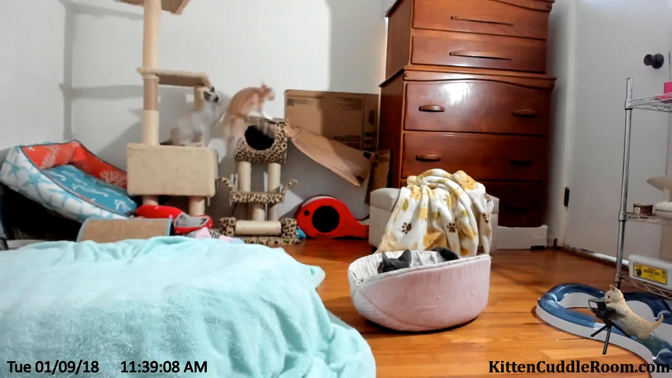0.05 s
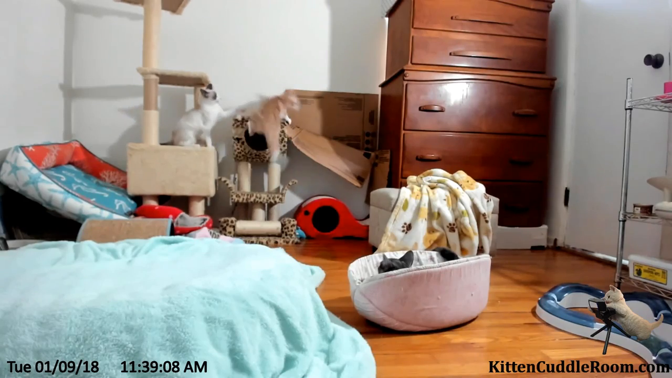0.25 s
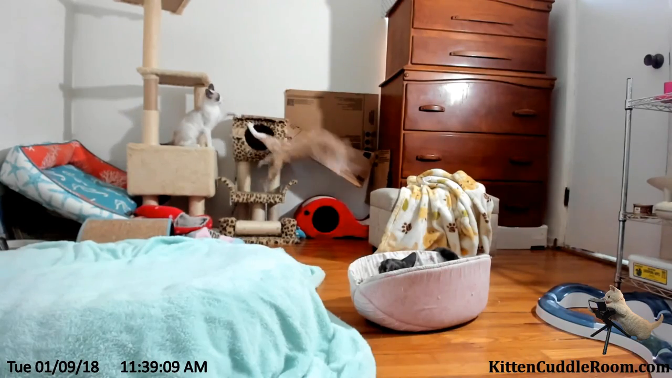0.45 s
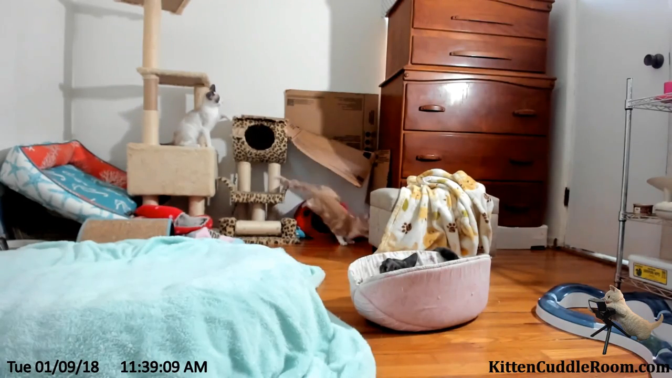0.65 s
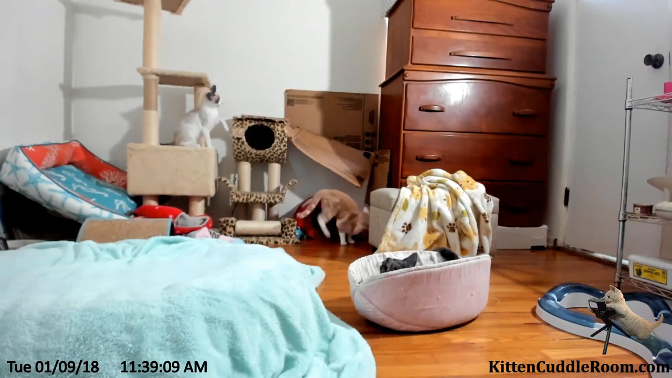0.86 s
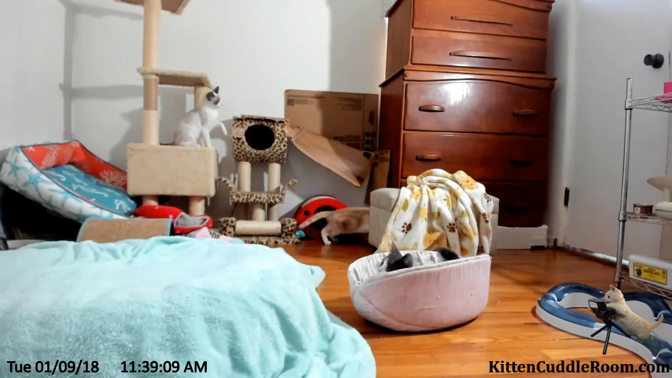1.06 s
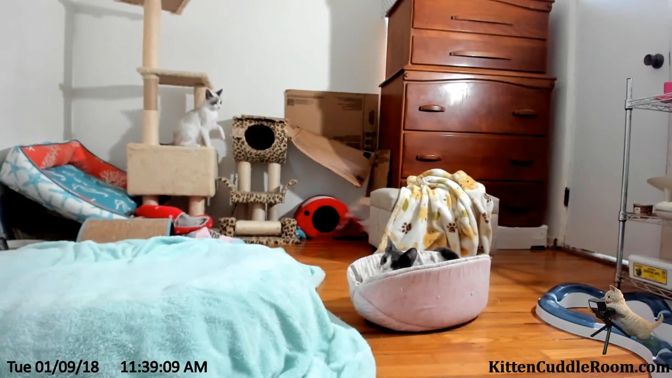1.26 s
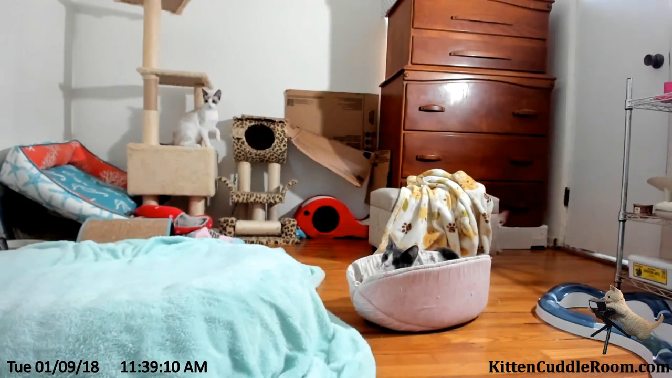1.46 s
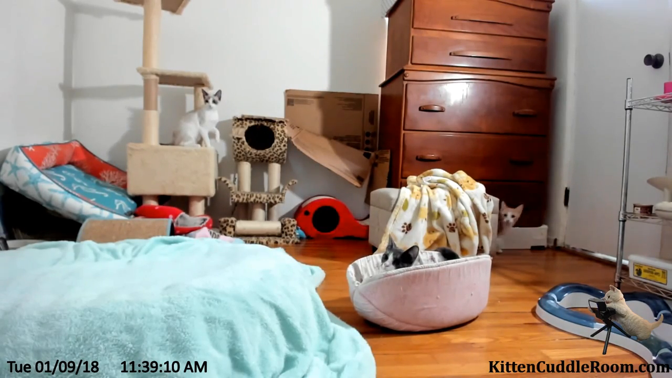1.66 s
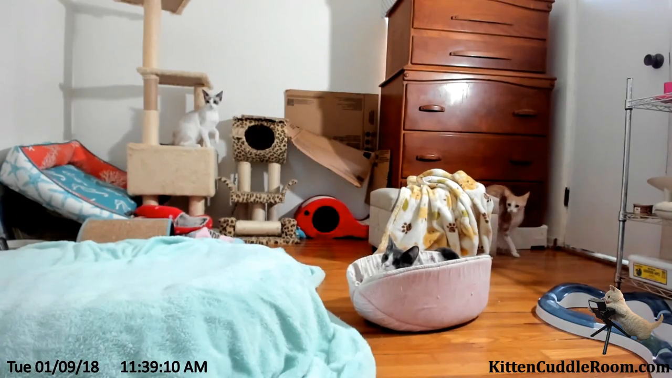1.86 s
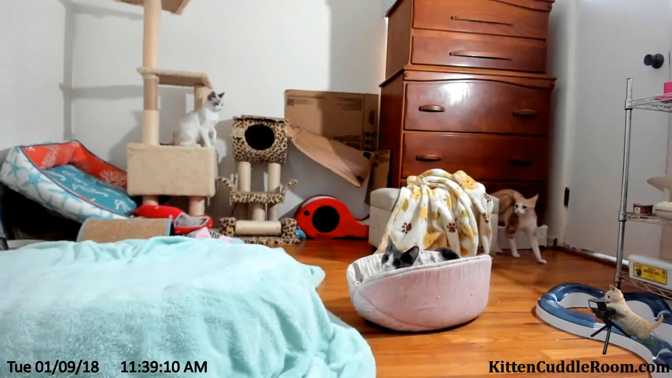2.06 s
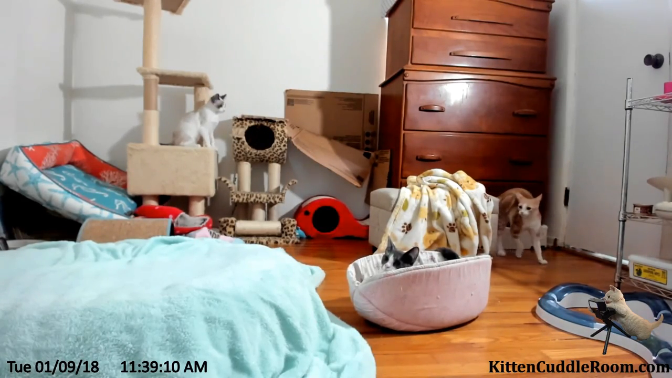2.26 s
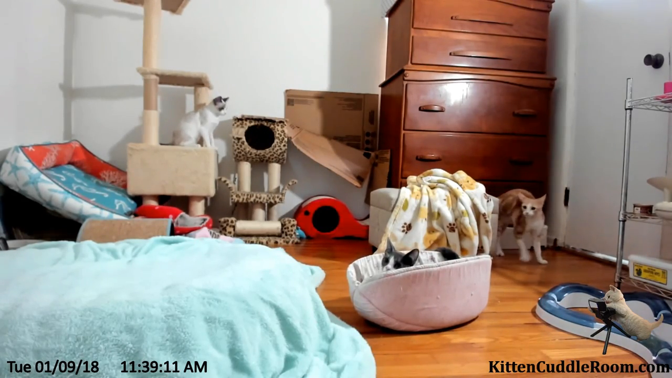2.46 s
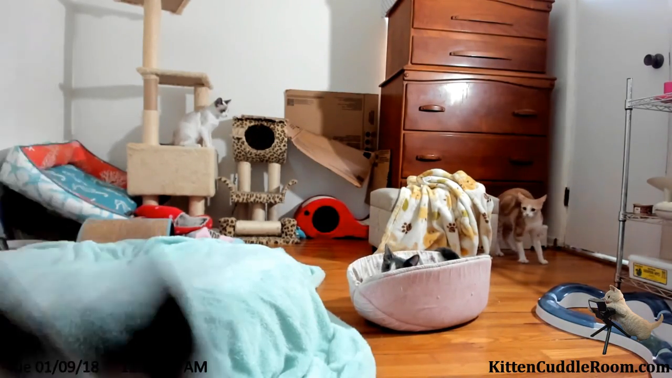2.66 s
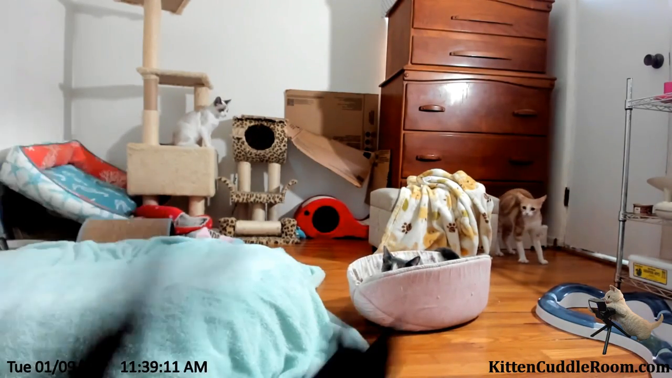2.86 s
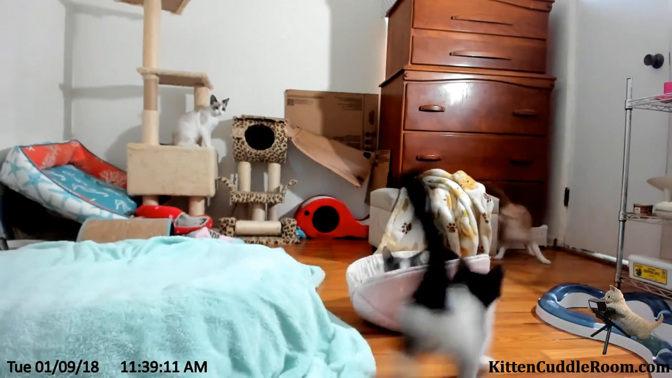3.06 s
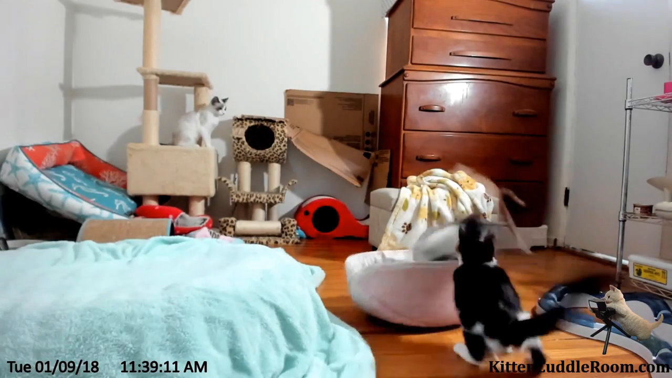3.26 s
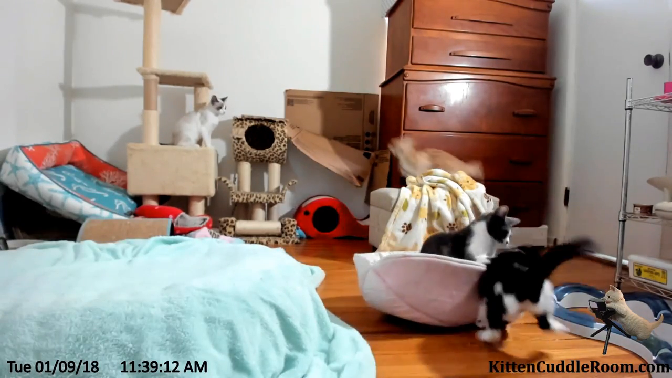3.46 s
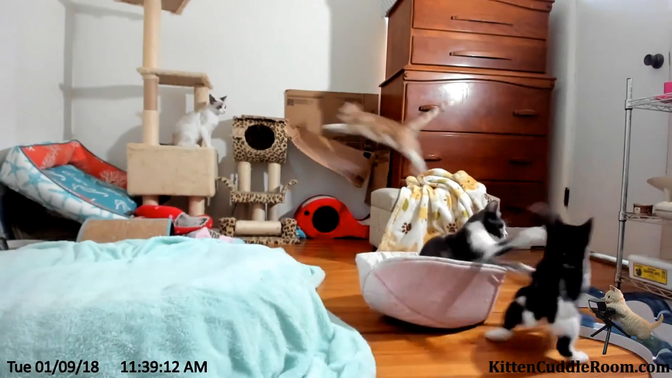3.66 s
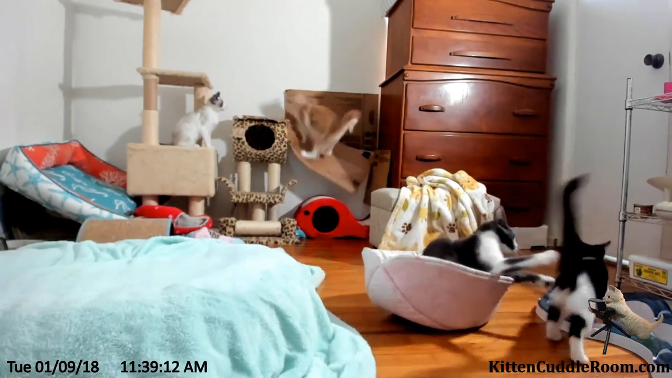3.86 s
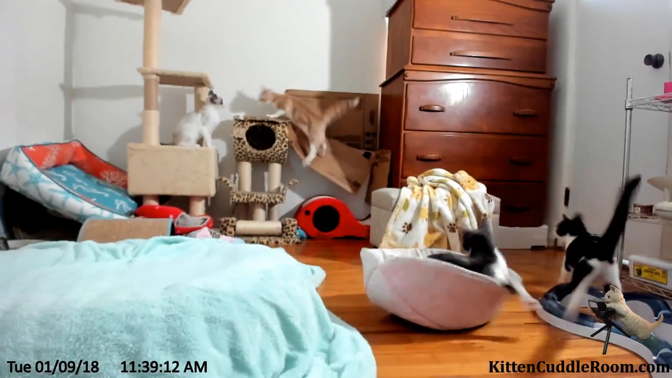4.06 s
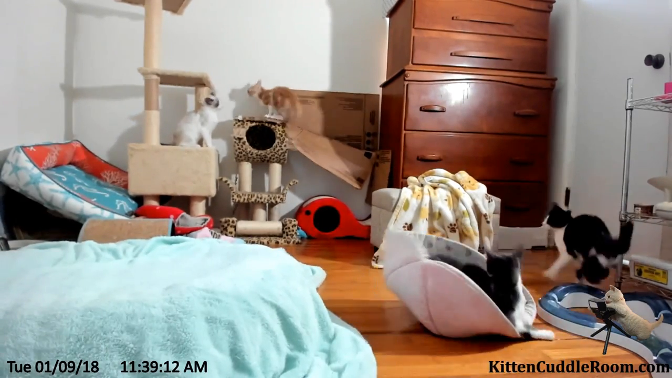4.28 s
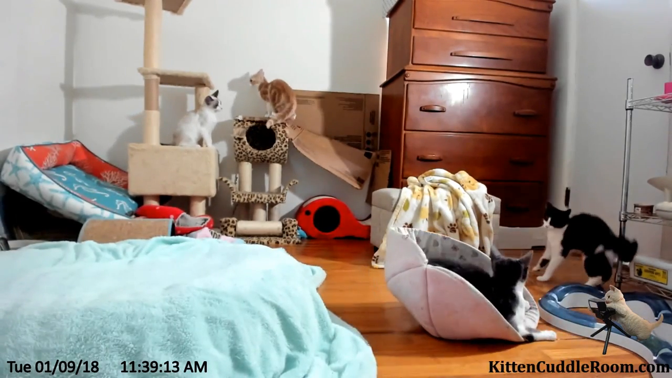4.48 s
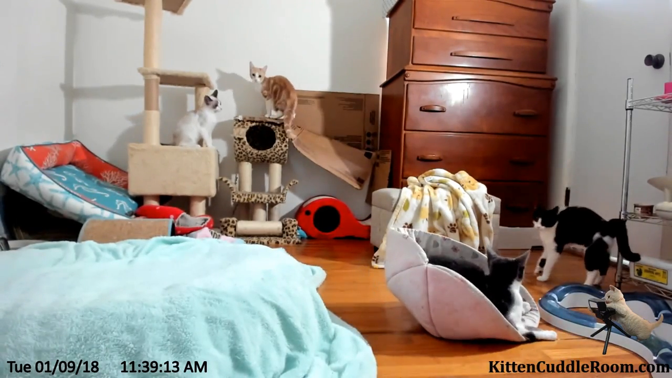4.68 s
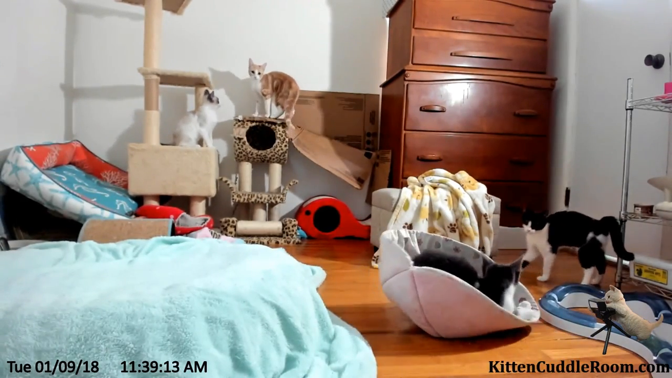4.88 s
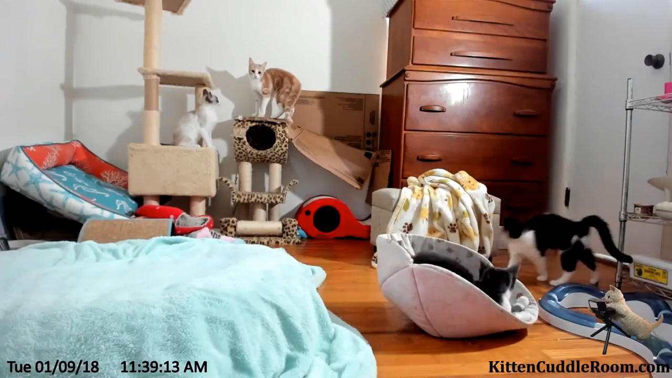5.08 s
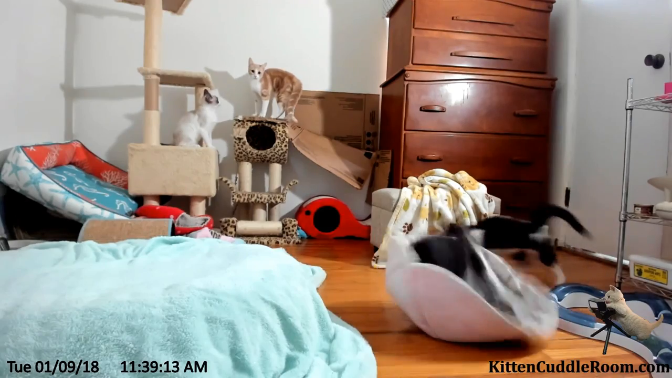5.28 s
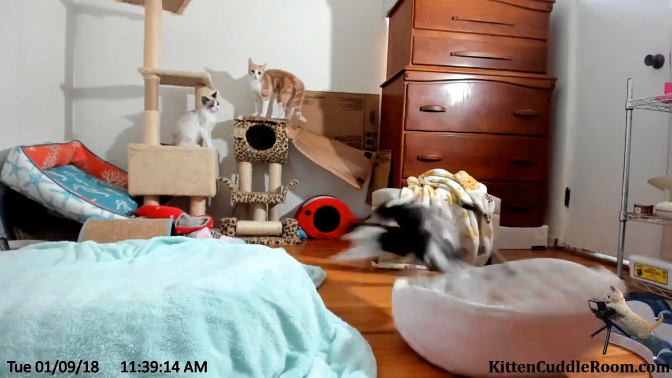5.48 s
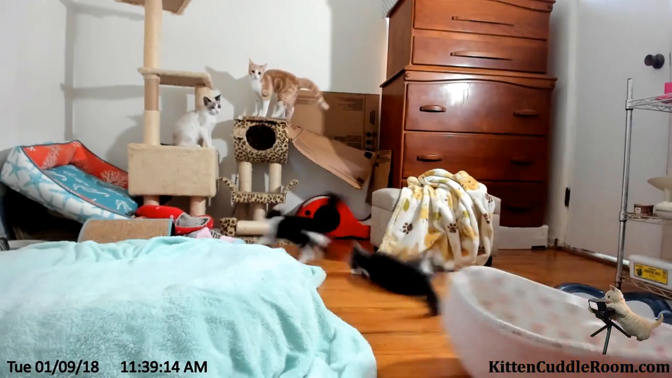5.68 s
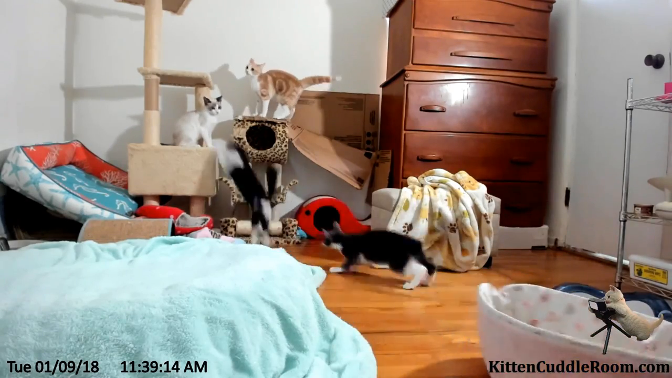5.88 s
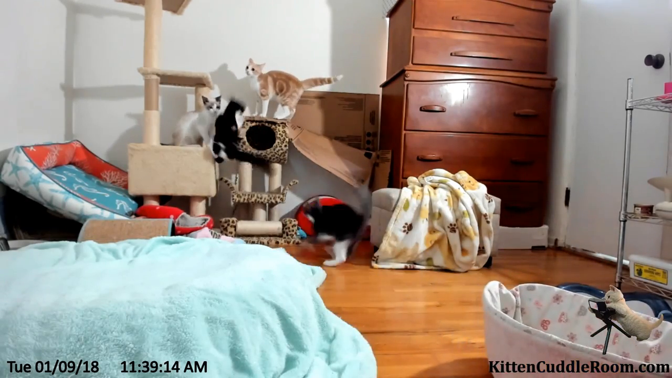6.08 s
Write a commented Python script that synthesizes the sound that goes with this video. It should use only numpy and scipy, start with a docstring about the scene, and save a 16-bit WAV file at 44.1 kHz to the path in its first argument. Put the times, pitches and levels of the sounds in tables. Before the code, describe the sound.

A fixed indoor microphone catches playful kittens: claws rasp on sisal and carpet, paws drum hollowly on boards, light steps scurry away. Quiet room air follows, broken by a firm paw knock and softer scuffles. Scraping jumps land with woody thuds, then calm returns. Finally a brief tussle bursts out as claws click and a pet bed rumbles across the floor, trailing into faint taps.

```python
"""Claws rip and tick at once, then paws knock and thud: kittens chase each other in a small bedroom.
Rips and slides are random grains under pressure strokes, coloured by carpet, sisal, cloth and panels.
Claw catches are noise bursts ringing the spot caught; paws ring modes of the boards and frame and slap.
Thuds differ in pitch on hardwood floor, cat tree, cardboard ramp and pet bed; slides rumble.
Short echoes, standing waves and faint steady air make up the room."""
import sys
import numpy as np
from scipy import signal
from scipy.io import wavfile

SR = 44100
rng = np.random.default_rng(int(sys.argv[2]) if len(sys.argv) > 2 else 0)


def pcm_store(signal):
    """Save signal as 16-bit PCM."""
    levels = np.round(np.clip(np.atleast_2d(signal), -1, 1) * 32767)
    wavfile.write(sys.argv[1], SR, levels.astype(np.int16).T)


N = 270333

# Levels of events are relative; each layer adds its own offset.
# claws catching on their own: (time [s], click [dB], spot caught [Hz], decay of the catch [s], snap [dB])
LONE_CATCHES = [(0.02, -31.5, 2390, 0.043, -57), (0.086, -35, 1900, 0.031, -36),
                (0.148, -40, 1760, 0.00092, -27), (0.176, -26, 1180, 0.0091, -57),
                (0.296, -61, 1600, 0.01, -33), (1.597, -67, 4080, 0.043, -79.5),
                (2.504, -53, 1760, 0.021, -91), (2.75, -37.5, 1450, .005, -72),
                (3.124, -39.5, 4600, 0.016, -41), (3.238, -35, 1500, 0.0037, -59),
                (3.244, -40, 1570, 0.0033, -44.5), (3.321, -54, 2100, 0.0066, -45.5),
                (3.525, -30, 2170, 0.0066, -73), (3.777, -36, 1980, 0.0095, -44.5),
                (4.013, -40.5, 1990, 0.033, -33.5), (4.313, -41.5, 1780, 0.019, -50),
                (5.612, -23.5, 2240, 0.0044, -33.5), (5.678, -28, 1640, 0.013, -70),
                (5.729, -47, 1362, .003, -41.5), (5.744, -30.5, 1230, 0.0081, -65),
                (5.888, -49.5, 2540, 0.023, -80), (6.009, -44.5, 3640, .005, -47)]
# modes of the boards around the spot struck, joists last: (multiple of the knock [1], level [dB], t60 [s])
BOARD_MODES = [(1, 4.5, 0.041), (.85, -12, 0.097), (1.24, -9, 0.074), (1.6, -10.5, 0.032),
               (.66, -13.5, 0.11), (.17, -34, 0.3)]
# modes of the heavy frame beneath: (multiple of the thud [1], level [dB], t60 [s])
FRAME_MODES = [(1, 4, 0.12), (1.2, -8, 0.15), (.77, -14, 0.26), (1.45, -7.5, 0.18)]
# resonances of cardboard and cat tree: (frequency [Hz], width [Hz], relative level [dB])
PANEL_MODES = [(1130, 220, 2.5), (1434, 140, 2.5), (2325, 600, 9), (2550, 98, -0.5), (3290, 90, -3.5),
               (3810, 77, 2.5), (7100, 700, 1.5), (8850, 600, 1.5)]
# spectrum of a pad's slap: (frequency [Hz], density [dB per Hz])
SLAP_SPECTRUM = [(25, -30.5), (100, 1.5), (350, 5), (600, 4), (800, 1), (1500, -1), (2200, -19.5),
                 (3200, -11.5), (8000, -27), (15000, -50.5)]
# spectrum of a click about the spot caught: (multiple of the spot's frequency [1], density [dB per Hz])
CLICK_SPECTRUM = [(.03, -43.5), (.6, -9.5), (.87, 0.5), (1.12, -0.5), (1.55, -10.5), (2.8, -19), (8, -55)]
# spectrum of a claw's bright snap: (frequency [Hz], density [dB per Hz])
SNAP_SPECTRUM = [(1500, -46.5), (3500, -14), (5000, 1), (8000, 0), (10500, -7.5), (15500, -26)]
# spectrum of rasping claws: (frequency [Hz], density [dB per Hz])
RASP_SPECTRUM = [(40, -52), (250, -17.5), (600, -2.5), (1000, -3), (1600, 1), (2600, -6), (4000, -12.5),
                 (6000, -12.5), (15000, -58)]
# spectrum of fizzing fibres and cloth: (frequency [Hz], density [dB per Hz])
FIZZ_SPECTRUM = [(2000, -22.5), (4000, 1), (5500, -5), (7500, 2), (10000, -3), (12500, -11), (15500, -23.5)]
# spectrum of the thing pushed: (frequency [Hz], density [dB per Hz])
RUMBLE_SPECTRUM = [(25, -32), (90, 1), (145, -2.5), (220, 2), (450, -4.5), (700, -10), (3500, -56)]
# spectrum of the room's still air: (frequency [Hz], density [dB per Hz])
AIR_SPECTRUM = [(15, -54.5), (25, -18), (119, -6.5), (204, -12.5), (233, -5.5), (274, -14), (358, -5.5),
                (15500, -40.5)]
AIR_RMS_DB = -68.5
# reverberation of the bedroom: (frequency [Hz], t60 [s])
ROOM_T60 = [(100, 0.22), (300, 0.28), (1000, 0.27), (3000, 0.23), (8000, 0.23), (15000, 0.32)]
# standing waves of the bedroom: (frequency [Hz], width [Hz], level [dB])
STANDING_WAVES = [(57, 8.7, -4.5), (125, 5.8, 7.5), (166, 5.3, -12.5), (316, 8.8, -1), (527, 30, 0.5)]
# share of the sound that the room scatters: (frequency [Hz], relative level [dB])
SCATTER_SHARE = [(60, -3.5), (500, -8), (1000, -6)]
# surfaces landed on, by the pitch of the thud [Hz]
FLOOR, TREE, RAMP, BED = 180.4, 150, 161, 155
# landings, one paw after the other: (time [s], gap to second paw [s], knock [dB], knock [Hz],
# thud [dB], slap [dB], pressing time of the first pad [s], thud pitch of the surface [Hz])
PAW_LANDINGS = [(0.15, .02, -40, 417, -55, -35.5, 0.0035, TREE),
                (0.171, .057, -17, 601, -47, -29.5, 0.0034, TREE),
                (0.3, .03, -34, 556, -34, -47, 0.01, TREE),
                (0.402, .027, -20.5, 403.5, -26, -36.5, .005, TREE),
                (0.603, .045, -12.5, 309, -28, -35.5, 0.0063, FLOOR),
                (0.669, .017, -11.5, 467, -13.5, -23, 0.0023, FLOOR),
                (0.72, .02, -24.5, 389, -18, -43.5, .002, FLOOR),
                (1.083, .018, -46, 476, -40.5, -55, .0027, FLOOR),
                (1.211, .012, -38, 524, -43.5, -50.5, 0.0028, FLOOR),
                (1.344, .03, -45.5, 453, -56, -67, 0.0013, FLOOR),
                (1.471, .012, -39.5, 358, -66.5, -60.5, 0.0068, FLOOR),
                (2.754, .0055, -15.5, 366.7, -35.5, -41, 0.0038, FLOOR),
                (2.878, .008, -28, 361, -33.5, -47, 0.0033, FLOOR),
                (3.025, .03, -50, 305, -45, -65, 0.0035, BED),
                (3.104, .021, -28.5, 369, -44, -40.5, .009, FLOOR),
                (3.238, .02, -39.5, 346, -41.5, -49.5, .0027, BED),
                (3.506, .088, -33.5, 497, -68, -68, .004, BED),
                (3.775, .0215, -22.5, 422, -25, -43.5, 0.0046, TREE),
                (3.903, .025, -19, 473, -16, -27.5, .003, RAMP),
                (4.013, .03, -26.5, 578, -28.5, -30, 0.0073, TREE),
                (4.165, .03, -49, 402, -45, -38, 0.0019, TREE),
                (4.321, .02, -38.5, 378, -44, -56, 0.0058, FLOOR),
                (4.816, .009, -44.5, 566, -54, -62.5, 0.0027, TREE),
                (5.329, .02, -44, 344, -67, -49.5, .0046, BED),
                (5.422, .023, -35, 301, -42, -52, 0.0048, FLOOR),
                (5.617, .015, -14, 438.3, -30, -28.5, 0.0064, BED),
                (5.67, .02, -23.5, 353, -26, -30, 0.0046, BED),
                (5.744, .02, -42, 390, -34, -39.5, .0024, BED),
                (5.85, .045, -54, 427, -36.5, -62, 0.0023, TREE),
                (6.114, .03, -62, 338, -41, -72, 0.0075, TREE)]
# second paw: softer, least so in the thud as the weight comes down
SECOND_KNOCK_DB, SECOND_THUD_DB, SECOND_SLAP_DB, SECOND_PRESS_S = -9.5, -5.5, -7.5, .0025
# leading claw: lead before the pad is pressed down; levels relative to the slap
CLAW_LEAD_S, CLAW_REL_DB, CLAW_HZ, CLAW_DECAY_S, CLAW_SNAP_REL_DB = .009, 0.5, 1570, 0.0047, -19.5
# strokes through carpet, sisal and cloth: (start [s], time to release [s], rasp [dB], fibre fizz [dB])
RIP_STROKES = [(-0.015, 0.048, -31, -36), (0.165, 0.069, -32.5, -35.5), (0.294, 0.09, -47, -49),
               (0.385, 0.017, -37, -44.5), (3.277, 0.051, -52.5, -50.5), (3.53, 0.051, -51.5, -63),
               (3.744, 0.033, -52.5, -83.5), (3.812, .065, -42, -40.5), (3.939, .1, -39, -39),
               (4.102, 0.052, -42, -50), (4.145, 0.045, -44.5, -41.5), (4.275, 0.043, -47, -56),
               (5.709, 0.088, -71, -55.5), (5.985, 0.036, -68.5, -69)]
RIP_RISE_S, RIP_FALL_DB_PER_S, RIP_RUMBLE_REL_DB = 0.0053, 181.5, -7
# bodies and pet bed sliding: (start [s], time to release [s], rumble [dB], rasp [dB], cloth fizz [dB])
SLIDE_STROKES = [(0.915, 0.15, -55, -61, -81), (1.18, 0.11, -54.5, -61.5, -83),
                 (1.434, 0.068, -59.5, -74.5, -94), (3.113, 0.16, -53, -65, -70),
                 (3.348, 0.12, -48.5, -57, -83), (3.496, 0.098, -49.5, -51.5, -67),
                 (5.2, 0.18, -64.5, -53.5, -59), (5.405, 0.023, -52, -56, -59), (5.5, .13, -57, -61, -62),
                 (5.599, 0.11, -32, -51, -76), (5.828, 0.17, -57, -62.5, -66)]
SLIDE_RISE_SHARE, SLIDE_FALL_DB_PER_S = 0.47, 133  # rise as a share of the time to release
# the longer a catch decays, the more its spot sings (width as a share of its Hz)
SQUEAK_DB_PER_S, SQUEAK_WIDTH_SHARE = 219, .22
LOW_CUT_HZ, HIGH_CUT_HZ = 27, 15700


def amp(db):
    """Decibels to gain."""
    return 10 ** (np.asarray(db) / 20)


def unit(x):
    """Scales to rms 1."""
    return x / np.sqrt(np.mean(x ** 2) + 1e-20)


def read(points, hz):
    """Interpolates the points of a spectrum on a log-frequency axis."""
    point_hz, value = np.transpose(points)
    return np.interp(np.log(hz + 1), np.log(point_hz), value)


def add(mix, start_s, sound):
    """Mixes a sound in at its start time."""
    part = mix[max(round(start_s * SR), 0):][:len(sound)]
    part += sound[:len(part)]


def colour(points, peaks=(), size=4096):
    """Causal minimum-phase response, of energy 1, of a spectrum with resonances on top."""
    hz = np.abs(np.fft.fftfreq(size, 1 / SR))
    db = read(points, hz)
    for peak_hz, width_hz, rise_db in peaks:
        db = db + rise_db / (1 + (2 * (hz - peak_hz) / width_hz) ** 2)
    spectrum = np.exp(np.conj(signal.hilbert(np.log(amp(db)))))
    response = np.fft.ifft(spectrum).real[:size // 2]
    return response / np.linalg.norm(response)


def through(x, response):
    """Passes a whole track through an impulse response."""
    return signal.oaconvolve(x, response)[:N]


def resonate(x, hz, width_hz):
    """A fixed resonance of peak gain 1."""
    return signal.lfilter(*signal.iirpeak(hz, hz / width_hz, fs=SR), x)


def wander(step_s):
    """A random curve with a new value every step."""
    knot_s = np.arange(0, N / SR + step_s, step_s)
    values = rng.standard_normal(N)[:len(knot_s)]
    return np.interp(np.arange(N) / SR, knot_s, values)


def still_air():
    """Steady noise coloured as the quiet air of the room."""
    return amp(AIR_RMS_DB) * through(rng.standard_normal(N), colour(AIR_SPECTRUM))


def stroke(start_s, length_s, rise_s, fall_db_per_s):
    """Pressure builds smoothly, holds and lets go."""
    t = np.arange(N) / SR - start_s
    rise = np.sin(np.pi / 2 * np.clip(t / rise_s, 0, 1)) ** 2
    return rise * amp(-fall_db_per_s * np.clip(t - length_s, 0, 1))


def rubbing():
    """Strength of rasp, fizz and rumble, summed over all rips and slides."""
    force = np.zeros((3, N))
    for start_s, length_s, rasp_db, fizz_db in RIP_STROKES:
        gains = amp([rasp_db, fizz_db, rasp_db + RIP_RUMBLE_REL_DB])
        force += np.outer(gains, stroke(start_s, length_s, RIP_RISE_S, RIP_FALL_DB_PER_S))
    for start_s, length_s, rumble_db, rasp_db, fizz_db in SLIDE_STROKES:
        gains = amp([rasp_db, fizz_db, rumble_db])
        rise_s = SLIDE_RISE_SHARE * length_s
        force += np.outer(gains, stroke(start_s, length_s, rise_s, SLIDE_FALL_DB_PER_S))
    return force


def slips(per_s, spread_db, clump_db, clump_s, smooth):
    """Fibres letting go one by one, in clumps, over a smooth rub."""
    size = amp(spread_db * np.minimum(rng.exponential(1, N), 4))
    grains = size * rng.choice([-1, 1], N) * (rng.random(N) < per_s / SR)
    rub = unit(grains) + smooth * rng.standard_normal(N)
    return unit(rub * amp(clump_db * wander(clump_s)))


def scuffles(rasp_db=-5, fizz_db=-6.0, rumble_db=-3, panel_db=-11, patchy_db=6):
    """Claws rip through carpet and cloth; the panels rasp and the thing pushed rumbles."""
    rasp, fizz, rumble = rubbing()
    rips = slips(per_s=1300, spread_db=4.0, clump_db=3.4, clump_s=.009, smooth=.35)
    fibres = slips(per_s=1000, spread_db=4.5, clump_db=3.5, clump_s=.007, smooth=.4)
    drag = slips(per_s=280, spread_db=-1.5, clump_db=1.5, clump_s=.015, smooth=0.55)
    scrape = through(rasp * rips, colour(RASP_SPECTRUM))
    # as the claws travel, now one panel answers, now another
    for hz, width_hz, db in PANEL_MODES:
        answer = unit(amp(patchy_db * wander(.028)))
        panel = unit(resonate(rips, hz, 0.5 * width_hz))
        scrape += amp(db + panel_db + read(RASP_SPECTRUM, hz)) * rasp * answer * panel
    hiss = through(fizz * fibres, colour(FIZZ_SPECTRUM, PANEL_MODES))
    push = through(rumble * drag, colour(RUMBLE_SPECTRUM))
    return amp(rasp_db) * scrape + amp(fizz_db) * hiss + amp(rumble_db) * push


def burst(rise_s, decay_s, skid_db, skid_s):
    """A swell of tiny contacts with a weaker skid as its tail."""
    t = np.arange(SR // 6) / SR
    swell = 1 - np.exp(-(t / rise_s) ** 2)
    shape = swell * (np.exp(-t / decay_s) + amp(skid_db) * np.exp(-t / skid_s))
    return rng.standard_normal(len(t)) * shape / shape.max()


def catches():
    """The claw that leads each landing, then those that catch on their own."""
    leading = [(s + press_s - CLAW_LEAD_S, slap_db + CLAW_REL_DB, CLAW_HZ, CLAW_DECAY_S,
                slap_db + CLAW_SNAP_REL_DB)
               for s, *_, slap_db, press_s, surface_hz in PAW_LANDINGS]
    return leading + LONE_CATCHES


def claws(click_db=-1, snap_db=-1):
    """A claw catches with a short bright snap and skids, ringing the spot it caught."""
    clicks, snaps = np.zeros(N), np.zeros(N)
    for s, one_click_db, hz, decay_s, one_snap_db in catches():
        squeak = (hz, SQUEAK_WIDTH_SHARE * hz, SQUEAK_DB_PER_S * decay_s)
        spot = colour([(multiple * hz, db) for multiple, db in CLICK_SPECTRUM], [squeak])
        catch = burst(rise_s=0.18 * decay_s, decay_s=decay_s, skid_db=-21.5, skid_s=0.0086)
        add(clicks, s, amp(one_click_db + click_db) * signal.fftconvolve(catch, spot))
        snap = burst(rise_s=0.00059, decay_s=0.43 * decay_s, skid_db=-21, skid_s=0.014)
        add(snaps, s, amp(one_snap_db + snap_db) * snap)
    return clicks + through(snaps, colour(SNAP_SPECTRUM, PANEL_MODES))


def footfalls():
    """Both paws: (time [s], knock [dB], knock [Hz], thud [dB], thud [Hz], slap [dB], pressing time [s])."""
    for s, gap_s, knock_db, knock_hz, thud_db, slap_db, press_s, thud_hz in PAW_LANDINGS:
        yield s, knock_db, knock_hz, thud_db, thud_hz, slap_db, press_s
        yield (s + gap_s, knock_db + SECOND_KNOCK_DB, knock_hz, thud_db + SECOND_THUD_DB, thud_hz,
               slap_db + SECOND_SLAP_DB, SECOND_PRESS_S)


def ring(modes, hz, contact_s):
    """Modes swelling while a soft pad presses down, then dying; peak 1."""
    t = np.arange(SR // 3) / SR
    wave = sum(amp(db - 60 * t / t60_s) * np.sin(2 * np.pi * ratio * hz * t)
               for ratio, db, t60_s in modes)
    wave = wave * (1 - np.exp(-(t / contact_s) ** 2))
    return wave / np.abs(wave).max()


def paws(knock_offset_db=0, thud_offset_db=-1, slap_offset_db=0):
    """Each paw knocks the boards, shakes the frame and slaps the surface."""
    wood, slaps = np.zeros(N), np.zeros(N)
    for s, knock_db, knock_hz, thud_db, thud_hz, slap_db, press_s in footfalls():
        add(wood, s, amp(knock_db + knock_offset_db) * ring(BOARD_MODES, knock_hz, press_s))
        # the frame is slower to move
        add(wood, s, amp(thud_db + thud_offset_db) * ring(FRAME_MODES, thud_hz, 1.3 * press_s))
        slap = burst(press_s, decay_s=0.0092, skid_db=-12.5, skid_s=0.05)
        add(slaps, s, amp(slap_db + slap_offset_db) * slap)
    return wood + through(slaps, colour(SLAP_SPECTRUM, PANEL_MODES))


def reflections(first_s=0.00074, build_s=0.0009):
    """Sparse echoes of random sign whose bands die at their own speed."""
    count = SR // 2
    taps = rng.choice([-1., 1.], count) * (rng.random(count) < 4000 / SR)
    taps *= np.clip((np.arange(count) / SR - first_s) / build_s, 0, 1)
    hz, t, bands = signal.stft(taps, SR, nperseg=256)
    decay_db = read(SCATTER_SHARE, hz)[:, None] - 60 * t / read(ROOM_T60, hz)[:, None]
    tail = signal.istft(bands * amp(decay_db), SR, nperseg=256)[1]
    return tail / np.linalg.norm(tail)


def bedroom(x, stride_s=.045, count=6):
    """Standing waves boom; the echoes cycle through several places as the kittens move."""
    place = np.arange(N) / SR / stride_s
    out = sum(amp(db) * resonate(x, hz, width_hz) for hz, width_hz, db in STANDING_WAVES)
    for k in range(count):
        away = np.abs((place - k) % count - count / 2)
        share = np.cos(np.pi / 2 * np.minimum(away, 1))
        out += through(x * share, reflections())
    return out


def scene(paw_room_db=-4, claw_room_db=-1):
    """Paws, claws and scuffles, direct and through the room, over its quiet air."""
    low, high = paws(), claws() + scuffles()
    room = bedroom(amp(paw_room_db) * low + amp(claw_room_db) * high)
    return (low + high + room + still_air())[None]


def record(dry):
    """A gentle cut of the deepest bass, and the recorder's band limit."""
    low_pass = signal.firwin(511, HIGH_CUT_HZ, window=("kaiser", 9), fs=SR)
    thinned = signal.lfilter(*signal.butter(2, LOW_CUT_HZ, "high", fs=SR), dry)
    return signal.oaconvolve(thinned, low_pass[None], "same")


dry = scene()
out = record(dry)
pcm_store(out)
```